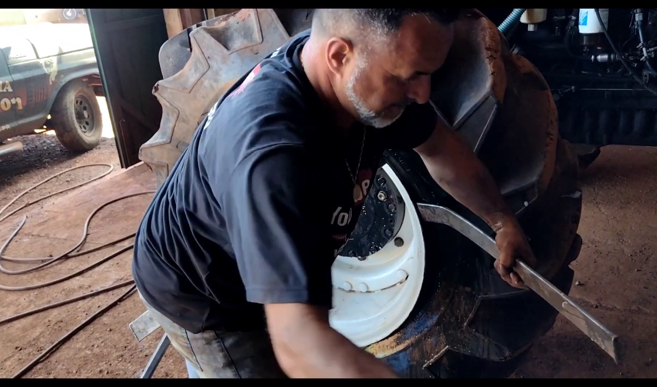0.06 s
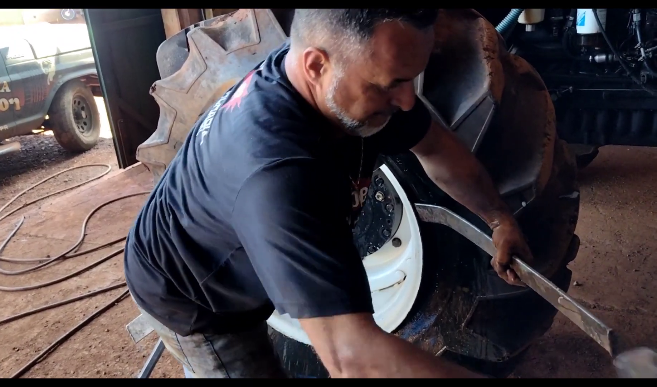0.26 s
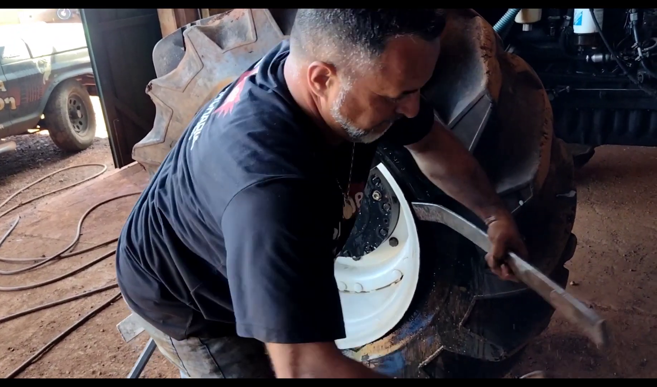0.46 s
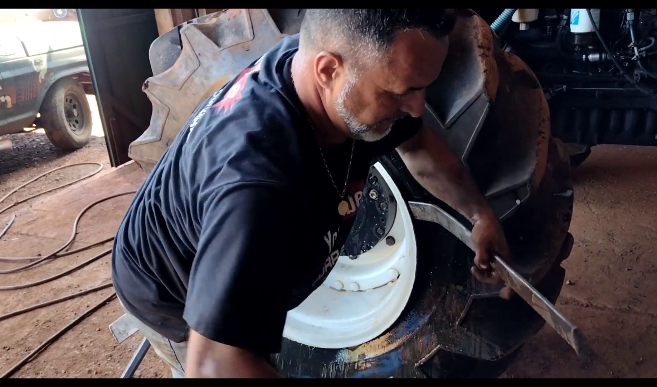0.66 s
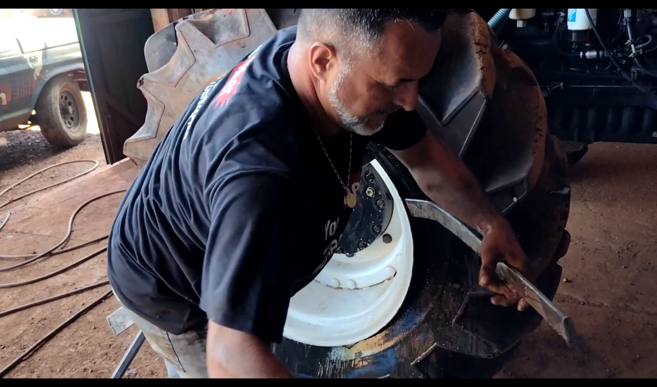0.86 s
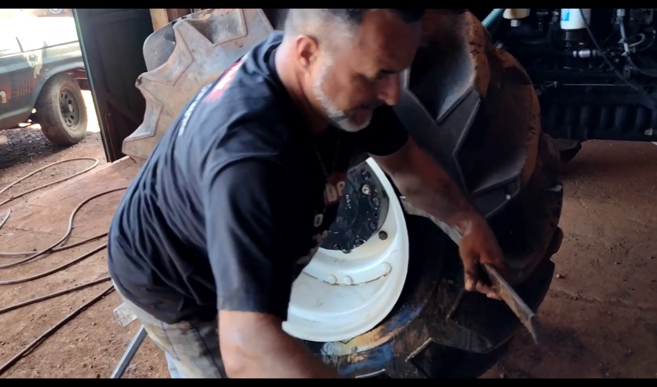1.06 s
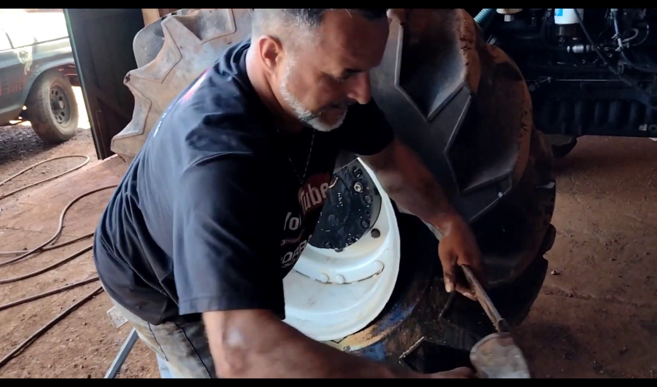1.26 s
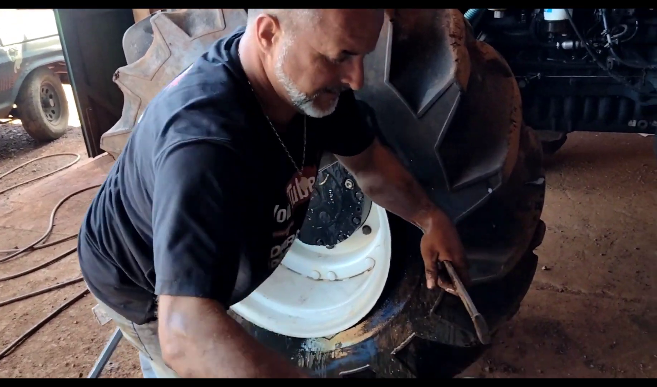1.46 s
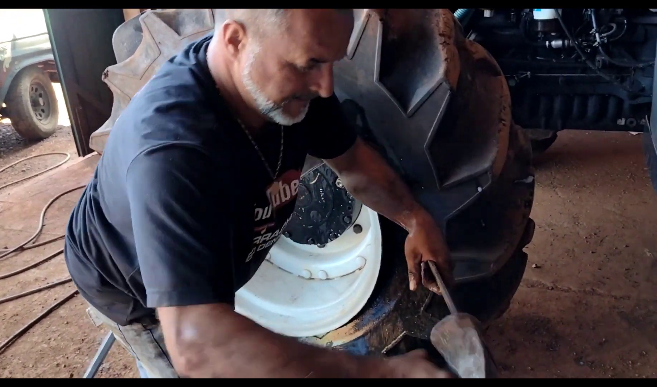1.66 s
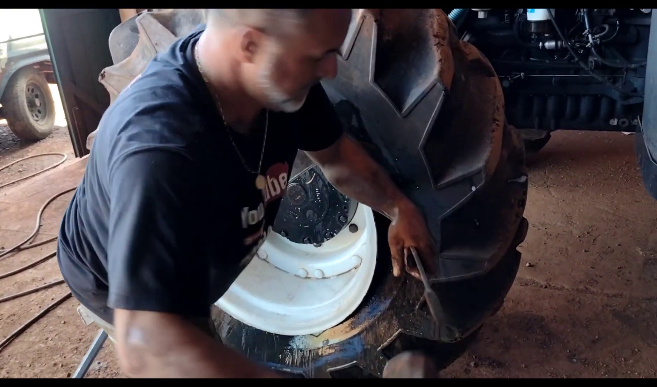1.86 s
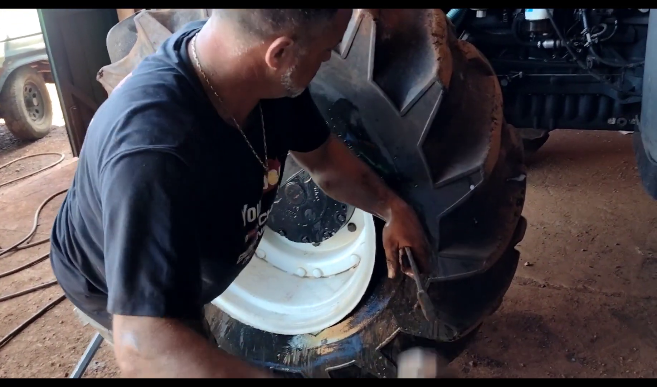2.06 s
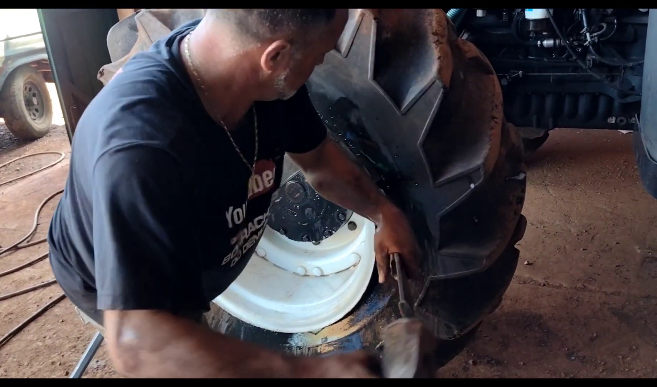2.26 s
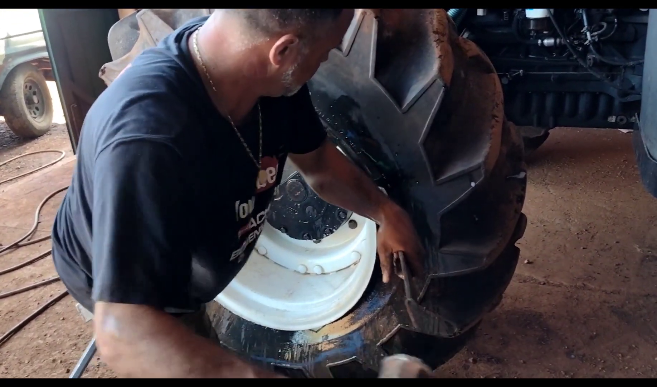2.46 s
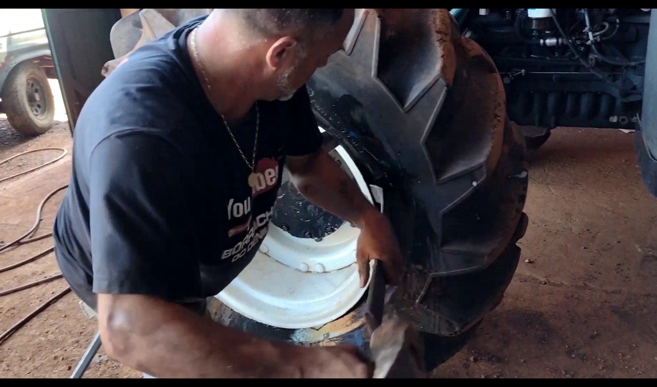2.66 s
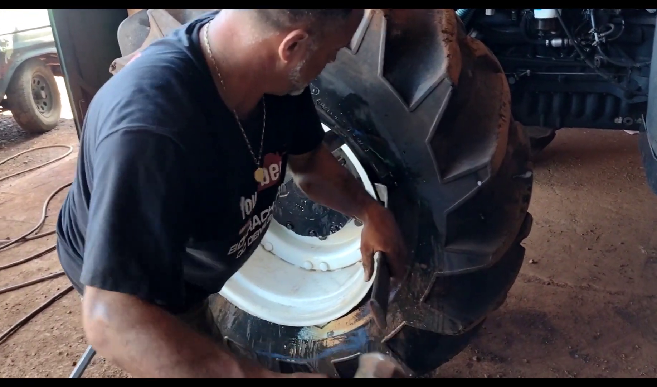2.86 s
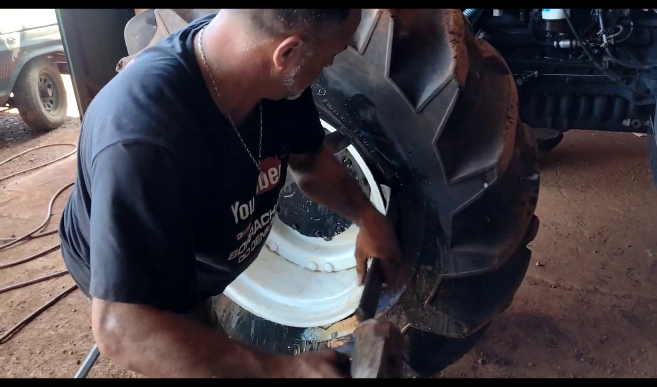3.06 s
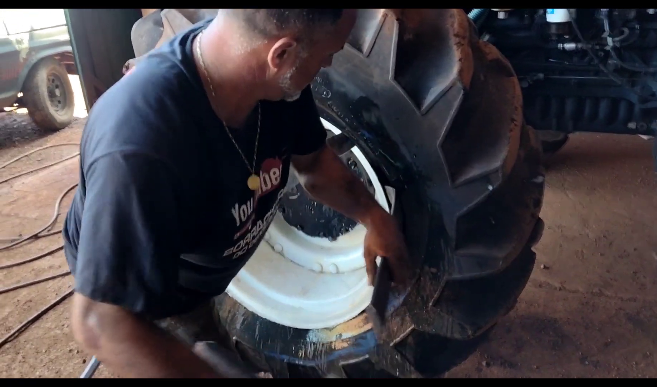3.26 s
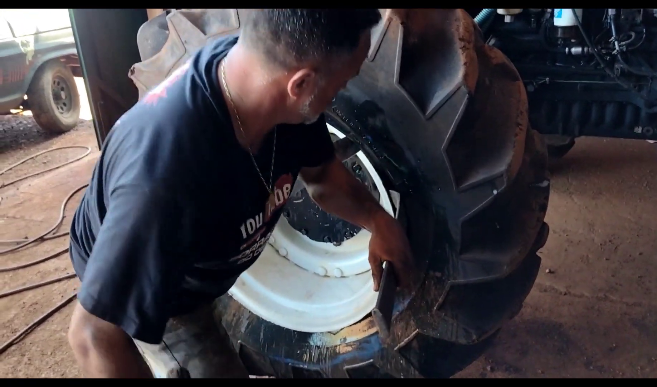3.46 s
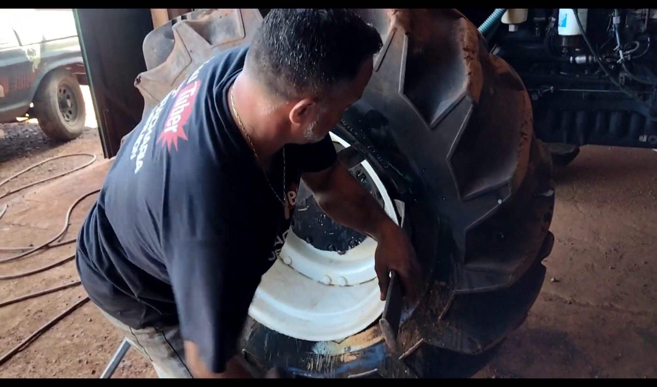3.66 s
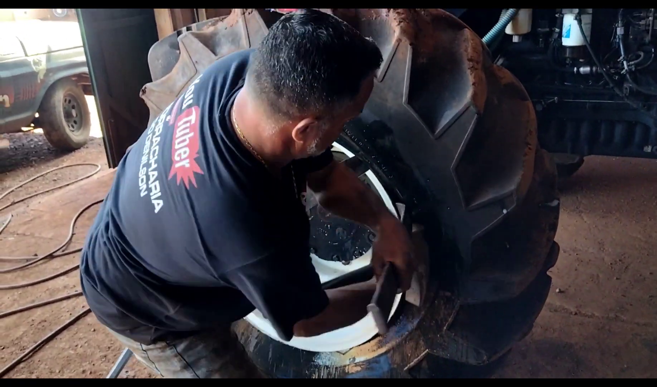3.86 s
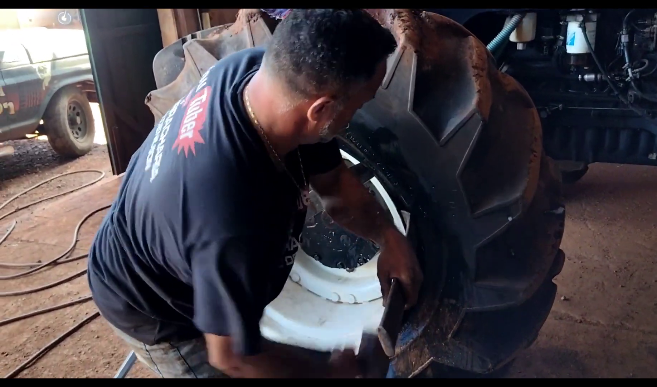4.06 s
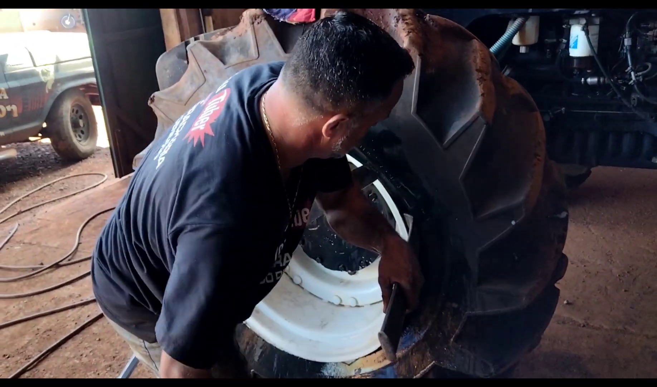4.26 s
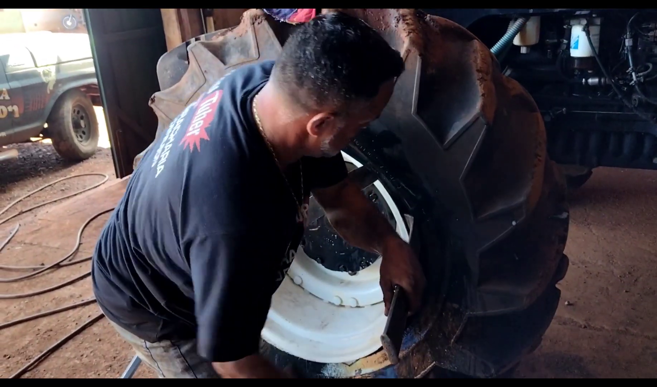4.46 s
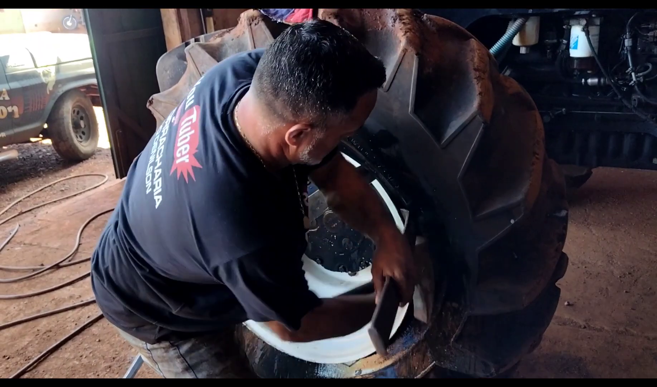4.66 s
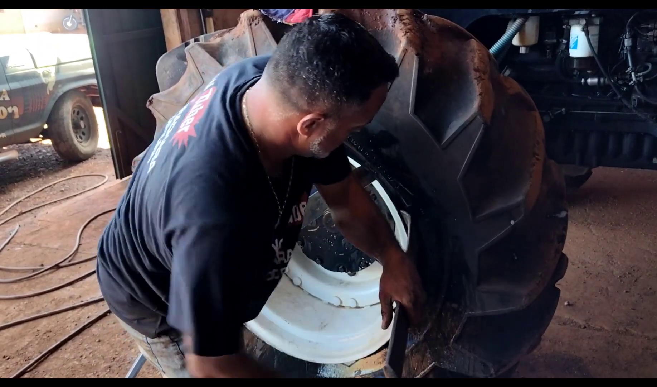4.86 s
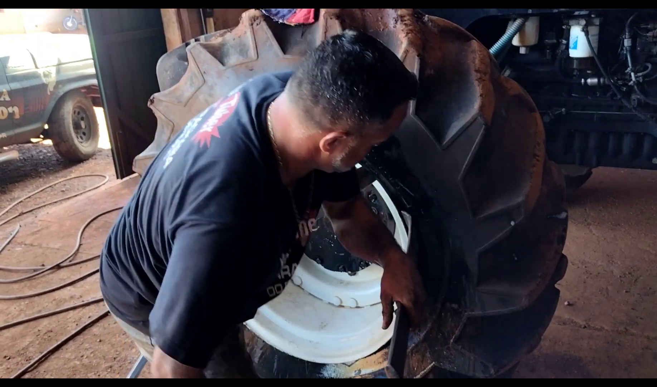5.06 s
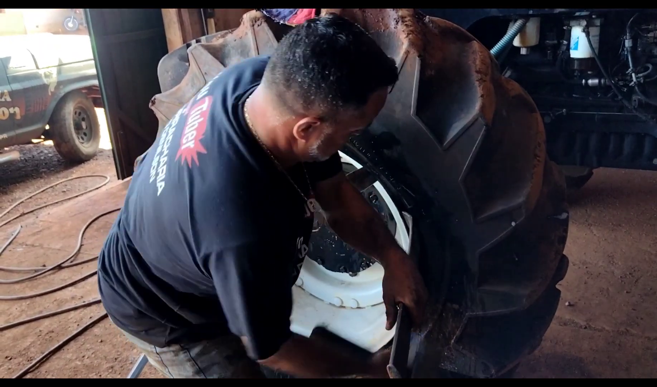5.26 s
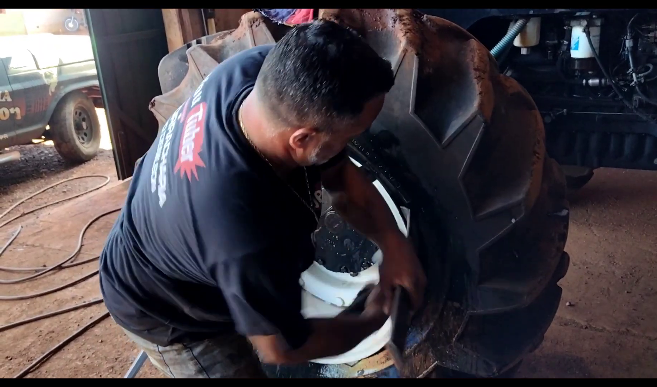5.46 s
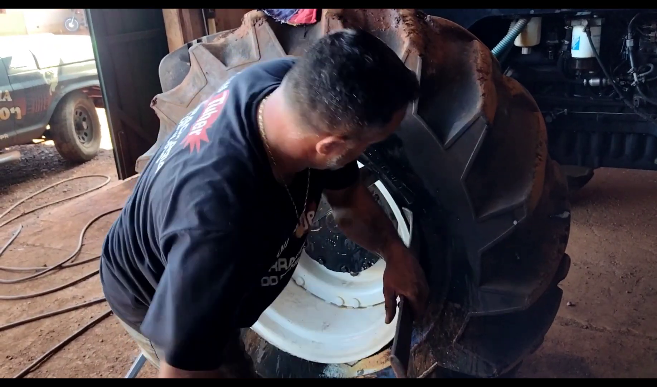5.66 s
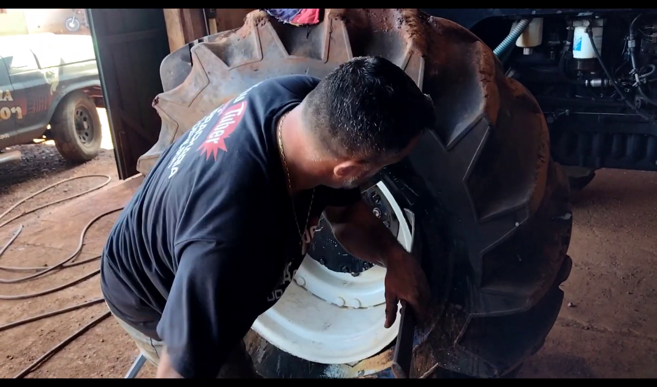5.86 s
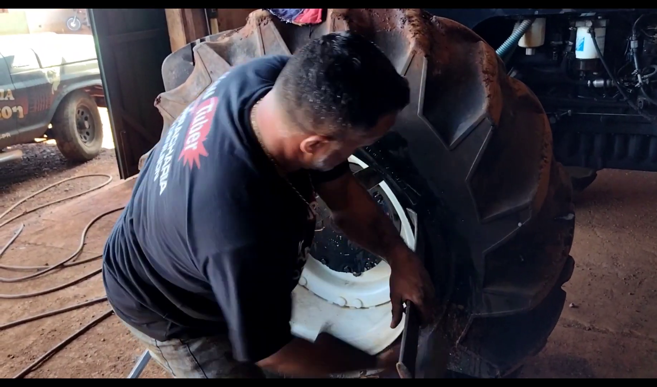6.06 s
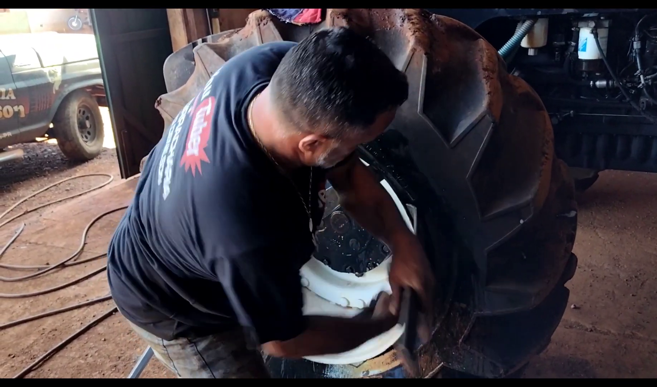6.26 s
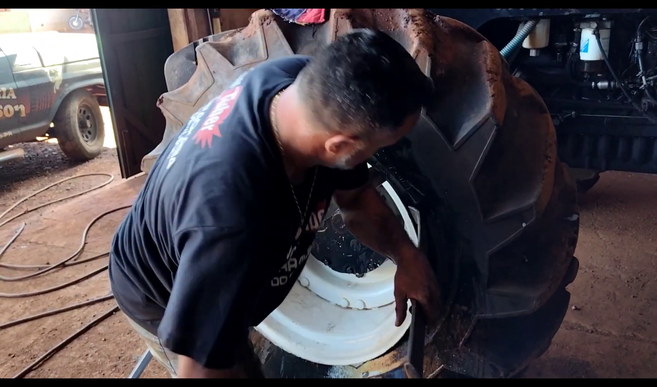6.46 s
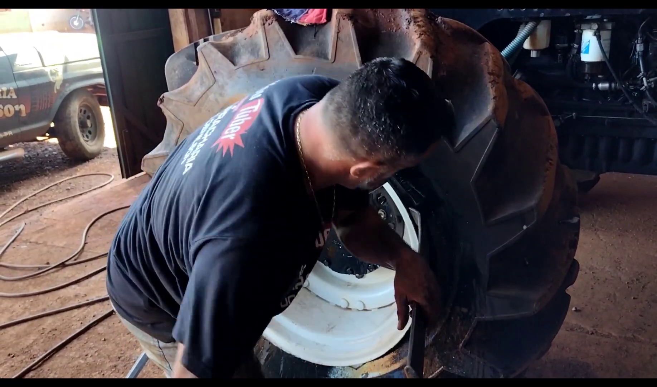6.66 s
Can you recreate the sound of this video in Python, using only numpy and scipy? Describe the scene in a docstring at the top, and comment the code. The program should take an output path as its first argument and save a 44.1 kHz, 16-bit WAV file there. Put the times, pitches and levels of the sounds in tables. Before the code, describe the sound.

A hammer drives a steel lever between a tractor tyre and its rim in a large, hard-walled shed. Each of ten blows gives a sharp crack, a low shudder from the tyre and a metallic ring that fades in the echo. Six blows come at a quickening pace, then four louder ones follow, slower and evenly spaced. The close microphone overloads slightly, and a faint hiss of air continues underneath.

```python
"""Hammering a tyre lever

Ten hammer blows drive a steel lever between a tractor tyre and its rim in a large, hard-walled shed.
Each blow cracks, the tyre shudders, and lever and rim ring on in the echo, over a faint hiss of air.
The close microphone overloads: a compressor holds the echo level, a limiter briefly ducks its start."""
import sys
import numpy as np
from scipy import signal
from scipy.fft import rfft, irfft, next_fast_len
from scipy.io import wavfile
from scipy.ndimage import uniform_filter1d, minimum_filter1d

SR = 44100
rng = np.random.default_rng(int(sys.argv[2]) if len(sys.argv) > 2 else 0)


def transcribe(signal):
    """Save signal, clipped to [-1, 1], as a 16-bit WAV file at the path in sys.argv[1]."""
    frames = np.atleast_2d(signal).T
    limited = np.clip(frames, -1, 1)
    pcm = np.round(limited * 32767).astype(np.int16)
    wavfile.write(sys.argv[1], SR, pcm)


N = 296381

# Each row: start in seconds, strength in dB, lever grip (0 loose, 2 driven home), ring time factor,
# tyre boom in dB, rim clank in dB, lower and upper partial of the struck spot in Hz, their lift in dB.
HAMMER_BLOWS = [(0.3846, 0, 0.7, 0.91, 6, -3.5, 970, 3594, 9.1),
                (1.235, 1, 0.58, 0.79, -0.5, 0, 1646, 7750, 5.3),
                (1.7441, -2.5, 0.64, 0.98, 2, 0.5, 3354, 3910, 8.1),
                (2.2276, -3.5, 0.13, 0.95, 2, -1, 3350, 5870, 4.1),
                (2.6786, -3.5, 0.2, 1, 0.5, 2, 773, 4040, 6),
                (3.0839, -4.5, 0.077, .84, 6.5, 1.5, 1130, 7700, 1.8),
                (3.9083, 0, 1, .99, -3, 1, 1614, 4280, 5.7),
                (4.6694, 2.5, 1.55, 1, -5.5, 3.5, 2600, 6600, 2.6),
                (5.407, 3.5, 2.07, .98, -5, -2, 2640, 7750, 4),
                (6.199, 4, 1.95, 1, -6.5, 1, 1420, 5670, 3.3)]
# Lever and rim resonances. Each row: centre in Hz, width in Hz, dB over the body at grip 0, 1 and 2.
STEEL_MODES = [(147.5, 88, 11, 11.5, 15.5), (200, 42.0, 9, 8, 7), (386, 82, 13, 4, 2),
               (629, 98, 1, 6.5, 6.5), (777.4, 49, 9.5, 7, 3), (1016, 90, 14, 4, 8),
               (1094, 88, 16.5, -16, 9.5), (1215, 103, 12, 4.5, 1), (1450, 125, 6.0, 3, 13),
               (1620, 85, 12, 9, 7.5), (1764, 180, 5.5, 2, -31), (1903, 75, 2, 4.5, -12),
               (2231, 310, 5, -7.5, 10), (2270, 93, 6, 4.5, -9), (2476, 92, 8, 5, -18),
               (2552, 45, 2.5, 3.5, 1), (2737, 310, 1.5, -5.5, 4.5), (3364, 155, 4.5, -3, 12.5),
               (3470, 120, 7.5, 8.5, -1), (4390, 220, -17, 5, 2), (5030, 190, 5, 2.5, 15.5),
               (5484, 175, 3, -6, 17), (5890, 46, 9, 7, -2), (6320, 220, 5.5, 7, 6),
               (6610, 260, -6, 8.5, 8), (6870, 180, -15, 3, 6), (7345.0, 180, -4, 12.5, 9),
               (7840, 520, 11, -9, 8.5), (9110, 160, 14.5, -0.5, 8), (9520, 370, -6, 1.5, 8.5)]
# Dense ring of the whole wheel. Each row: frequency in Hz, relative density in dB.
WHEEL_BODY_DB = [(60.0, -15), (110.0, -23), (250.0, -11), (500.0, -16.5), (700.0, -6.5), (1500.0, -7.5),
                 (2400.0, 0.5), (3000.0, -4.5), (3700.0, -5), (4700.0, -6.5), (7500.0, -5.5),
                 (10000.0, -9.5), (11500.0, -9.5), (14000.0, -22)]
# Seating the lever damps its shank's buzz and feeds the rim's clang.
# Each row: frequency in Hz, gain when loose in dB, change in dB per step of grip.
SEATING_DB = [(510, -.5, -0.5), (1100, 1.5, 0), (2420, -1.5, 1.38), (4030, 3.5, -3), (6400, -.5, 0),
              (10000, 0.06, 0.45)]
# Radiation of each group of modes. Each row: frequency in Hz, left over right in dB.
RADIATION_PAN_DB = [(450, 2.5), (1100, 2.5), (2400, -7), (4000, 2.2), (6800, -10), (9500, 3)]
# Hammer contact. Each row: frequency in Hz, relative density in dB.
CRACK_SPECTRUM_DB = [(60, -4.5), (200, -9), (500, -7), (1100, -5.5), (2000, -3), (3200, 4), (4500, -4),
                     (6500, -3), (9000, -5.5), (12000, -12.5), (15500, -25)]
# Shed echo. Each row: frequency in Hz, T60 in seconds before the blow's ring time factor.
SHED_T60_S = [(50, 1.38), (130, 1.12), (500, 1.31), (1100, 1.17), (2300, 1.407), (5000, 1.18), (8000, 0.98),
              (11000, 0.69), (15000, 0.19)]
# Echo at the two microphones. Each row: frequency in Hz, correlation from -1 to 1.
ECHO_CORRELATION = [(60, 0.52), (180, 1), (380, 0.87), (700, 0.62), (1400, -0.16), (2600, 0.074),
                    (14000, 0.012)]
# Steady air. Each row: frequency in Hz, relative density in dB.
AIR_SPECTRUM_DB = [(15, -35), (25, 10), (173, -19.5), (349, -16), (567, -22), (1020, -15), (1410, -24.5),
                   (2490, -16.5), (4620, -29.5), (6210, -8.5), (7100, -12.5), (10400, -2.5), (11200, -7),
                   (13900, -12.5), (15500, -21.5)]
# Air at the two microphones. Each row: frequency in Hz, correlation from 0 to 1.
AIR_CORRELATION = [(60, 0.16), (180, 0.61), (550, 0.91), (1650, 0.099), (4970, 0.041), (15000, 0.038)]
# Air balance. Each row: frequency in Hz, left over right in dB.
AIR_PAN_DB = [(60, -3), (180, -2), (550, -2), (1650, -3), (4970, -17.5), (15000, 6)]


def steel_ring(grip, t60_factor, spot, left_db, level_db=0.5, ripple_db=1.54):
    """Lever and rim ring in the echo; each blow lands differently and favours other narrow partials."""
    echo = shed_echo(t60_factor, left_db)
    hz = np.fft.rfftfreq(echo.shape[1], 1 / SR)
    ripple = unit_rms(uniform_filter1d(rng.standard_normal(len(hz)), size=60))
    partials = unit_rms(gain_of(ripple_db * ripple))
    response = minimum_phase(partials * wheel_gain(hz, grip, spot))
    return gain_of(level_db) * irfft(rfft(echo) * response)


def wheel_gain(hz, grip, spot):
    """Spectrum of the struck wheel: the lever's grip weights the modes, the struck spot colours them."""
    modes = np.array(STEEL_MODES)
    grip_weights = np.maximum(1 - abs(np.clip(grip, 0, 2) - np.arange(3)), 0)
    mode_power = gain_of(modes[:, 2:] @ grip_weights) ** 2
    power = 1 + resonance(hz, modes[:, 0], modes[:, 1]) @ mode_power
    seating_db = lookup(SEATING_DB, hz) + grip * lookup(SEATING_DB, hz, column=2)
    colour_db = lookup(WHEEL_BODY_DB, hz) + seating_db + spot_colour_db(hz, *spot)
    return unit_rms(np.sqrt(power) * gain_of(colour_db))


def spot_colour_db(hz, boom_db, clank_db, low_hz, high_hz, lift_db):
    """Where the hammer lands sets how much tyre and rim are stirred, and which two partials sing."""
    boom = bell_curve(hz, centre_hz=174, width_octaves=1)
    clank = bell_curve(hz, centre_hz=660, width_octaves=1.12)
    partial_hz = np.array([low_hz, high_hz])
    partials = resonance(hz, partial_hz, width_hz=0.065 * partial_hz).sum(1)
    return boom_db * boom + clank_db * clank + lift_db * partials


def shed_echo(t60_factor, left_db, build_s=0.0016, flutter_db=1.08, flutter_s=0.0032):
    """Sound scattered by the shed builds up, arrives in uneven clumps and loses its treble first."""
    t, hz = np.arange(2 * SR) / SR, np.fft.rfftfreq(2 * SR, 1 / SR)
    pan_db = lookup(RADIATION_PAN_DB, hz) + left_db
    scatter = irfft(noise_spectra(len(t), lookup(ECHO_CORRELATION, hz), pan_db))
    band_hz, frame_s, frames = signal.stft(scatter, SR, nperseg=256)
    t60_s = t60_factor * lookup(SHED_T60_S, band_hz)[:, None]
    echo = signal.istft(frames * gain_of(-60 * frame_s / t60_s), SR)[1][:, :len(t)]
    flutter = unit_rms(smooth(rng.standard_normal((2, len(t))), flutter_s))
    return echo * gain_of(flutter_db * flutter) * (1 - np.exp(-t / build_s))


def hammer_crack(level_db=8, contact_s=0.00058, reflection_db=-8, reflection_s=0.024, left_lag_s=0.00022):
    """Steel meets steel, slightly to the right: a short burst, then reflections off wheel and floor."""
    size = 4096
    t, hz = np.arange(size) / SR, np.fft.rfftfreq(size, 1 / SR)
    envelope = np.exp(-(t / contact_s) ** 2) + gain_of(reflection_db) * np.exp(-t / reflection_s)
    burst = irfft(noise_spectra(size, correlation=0.32, pan_db=-1)) * envelope
    delay = np.exp(-2j * np.pi * hz * np.array([[left_lag_s], [0]]))
    response = minimum_phase(unit_rms(gain_of(lookup(CRACK_SPECTRUM_DB, hz))))
    return gain_of(level_db) * irfft(rfft(burst) * delay * response)


def tyre_shudder(level_db=-39, shudder_hz=33, decay_s=0.32):
    """The heavy tyre shudders on its rim after a blow."""
    t = np.arange(3 * SR) / SR
    return gain_of(level_db) * pan_gains(2.2) * np.sin(2 * np.pi * shudder_hz * t) * np.exp(-t / decay_s)


def air(level_db=-40):
    """Low workshop rumble and a thin hiss of escaping air."""
    size = 2 * next_fast_len(N // 2 + 1)
    hz = np.fft.rfftfreq(size, 1 / SR)
    white = noise_spectra(size, lookup(AIR_CORRELATION, hz), lookup(AIR_PAN_DB, hz))
    sound = irfft(white * gain_of(lookup(AIR_SPECTRUM_DB, hz)))[:, :N]
    return gain_of(level_db) * sound / sound.mean(0).std()


def compressor(x, knee_db=-14.0, sense_s=0.0047, attack_s=0.005):
    """Holds loud sound near the knee; too slow to catch a crack."""
    power = smooth((x ** 2).mean(0), sense_s)
    over_db = 10 * np.log10(1 + power / gain_of(knee_db) ** 2)
    return x * gain_of(-smooth(over_db, attack_s))


def limiter(x, duck_share=0.33, trigger_db=-10, knee_db=1.5, ahead_s=0.009, hold_s=0.077):
    """Looks ahead and ducks by a share of a crack's jump over the sound before it; holds, then lets go."""
    attack_s, release_s = 0.00012, 0.0031
    ahead, hold = round(ahead_s * SR), round(hold_s * SR)
    power = (x ** 2).mean(0)
    level_db = 10 * np.log10(smooth(power, lag_s=0.0015) + 1e-12)
    power_before = np.r_[np.zeros(ahead), smooth(power, lag_s=0.03)[:-ahead]]
    jump_db = np.maximum(level_db - 10 * np.log10(power_before + 2e-4), 0)
    triggered = np.clip((level_db - trigger_db) / knee_db, 0, 1)
    duck_db = -duck_share * triggered * jump_db
    held_db = minimum_filter1d(duck_db, ahead + hold + 1, origin=(hold - ahead) // 2)
    return x * gain_of(np.minimum(smooth(held_db, attack_s), smooth(held_db, release_s)))


def input_sway(level_db=-15, swing_hz=2.2, rise_s=0.0066, decay_s=0.22, lag_s=0.037):
    """The overloaded input swings back to rest after a blow, below hearing."""
    t = np.arange(SR) / SR
    envelope = np.exp(-t / decay_s) * (1 - np.exp(-t / rise_s))
    return gain_of(level_db) * pan_gains(3.1) * np.sin(2 * np.pi * swing_hz * (t - lag_s)) * envelope


def resonance(hz, centre_hz, width_hz):
    """Power response, 1 at the centre."""
    return 1 / (1 + (2 * (hz[:, None] - centre_hz) / width_hz) ** 2) ** 2


def bell_curve(hz, centre_hz, width_octaves):
    """Gaussian over log frequency."""
    return np.exp(-(np.log2((hz + 1) / centre_hz) / width_octaves) ** 2)


def minimum_phase(gain):
    """Gives a gain curve the phase of a body that rings only after it is struck."""
    log_gain = np.log(np.maximum(np.r_[gain, gain[-2:0:-1]], 1e-5))
    return np.exp(np.conj(signal.hilbert(log_gain)))[:len(gain)]


def noise_spectra(size, correlation, pan_db):
    """Partly correlated white noise at two microphones."""
    left, other = rfft(rng.standard_normal((2, size)))
    correlation = np.clip(correlation, -1, 1)
    right = correlation * left + np.sqrt(1 - correlation ** 2) * other
    return np.array([left, right]) * pan_gains(pan_db)


def pan_gains(left_db):
    """Stereo gains for a level of left over right."""
    return gain_of(np.array([left_db, -left_db]).reshape(2, -1) / 2)


def gain_of(db):
    """Decibels to amplitude."""
    return 10 ** (np.asarray(db) / 20)


def unit_rms(x):
    """Scales to rms 1."""
    return x / np.sqrt(np.mean(x ** 2) + 1e-20)


def lookup(table, hz, column=1):
    """Interpolates a column over log frequency."""
    columns = np.transpose(table)
    return np.interp(np.log(hz + 1), np.log(columns[0] + 1), columns[column])


def smooth(x, lag_s):
    """One-pole lag."""
    pole = np.exp(-1 / (lag_s * SR))
    return signal.lfilter([1 - pole], [1, -pole], x)


def add(mix, start_s, sound):
    """Mixes in a stereo sound."""
    part = mix[:, round(start_s * SR):][:, :sound.shape[1]]
    part += sound[:, :part.shape[1]]


def scene(drift_db_per_s=0.5):
    """Ten blows over steady air; each rings further left as the microphone moves round the wheel."""
    mix = air()
    for start_s, strength_db, grip, t60_factor, *spot in HAMMER_BLOWS:
        left_db = drift_db_per_s * start_s
        add(mix, start_s, gain_of(strength_db) * steel_ring(grip, t60_factor, spot, left_db))
        add(mix, start_s, gain_of(strength_db) * tyre_shudder())
        add(mix, start_s, gain_of(strength_db / 2) * hammer_crack())
    return mix


def record(dry, ceiling_db=2, cutoff_hz=15600):
    """Compressor, soft clip, input sway, limiter, low-pass."""
    ceiling = gain_of(ceiling_db)
    clipped = ceiling * np.tanh(compressor(dry) / ceiling)
    for start_s, *_ in HAMMER_BLOWS:
        add(clipped, start_s, input_sway())
    low_pass = signal.firwin(255, cutoff_hz, window=("kaiser", 9), fs=SR)
    return signal.oaconvolve(limiter(clipped), low_pass[None], "same")


dry = scene()
out = record(dry)
transcribe(out)
```